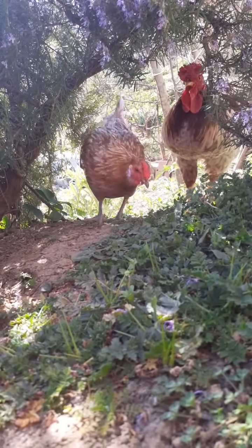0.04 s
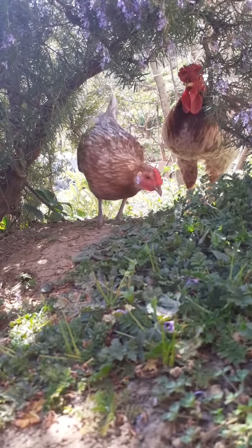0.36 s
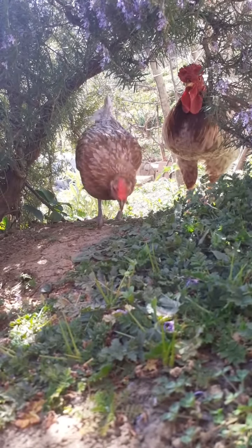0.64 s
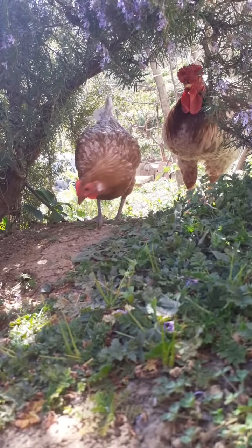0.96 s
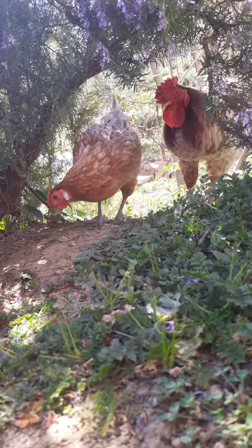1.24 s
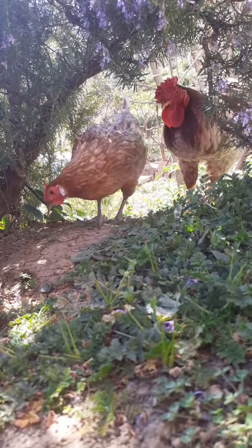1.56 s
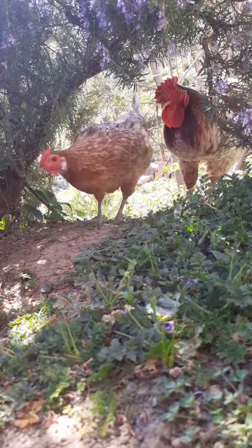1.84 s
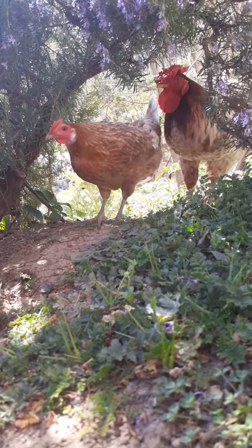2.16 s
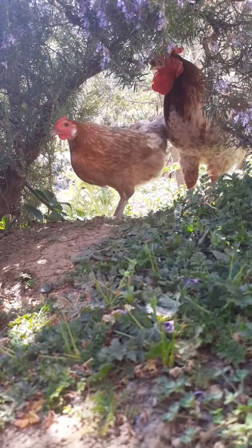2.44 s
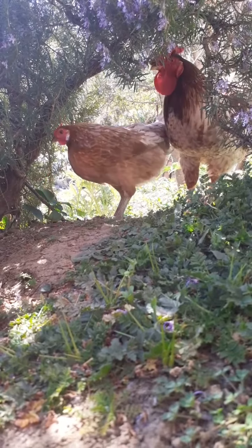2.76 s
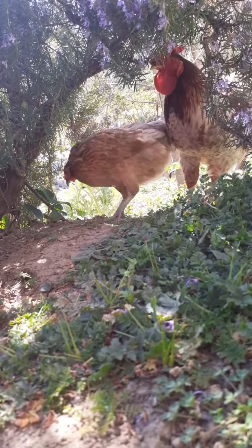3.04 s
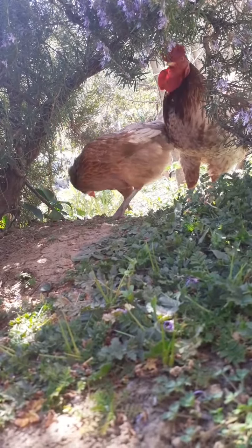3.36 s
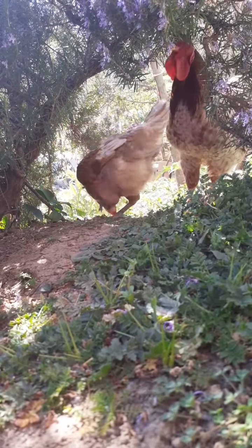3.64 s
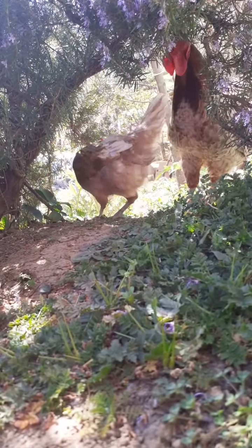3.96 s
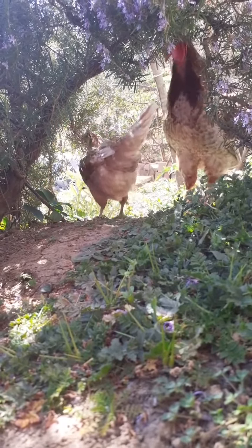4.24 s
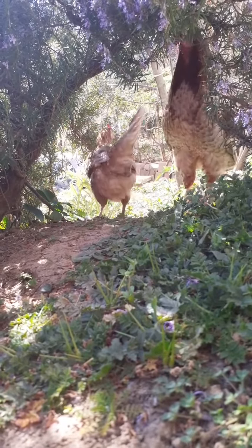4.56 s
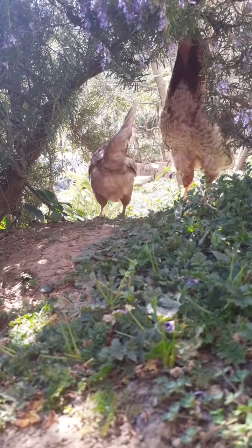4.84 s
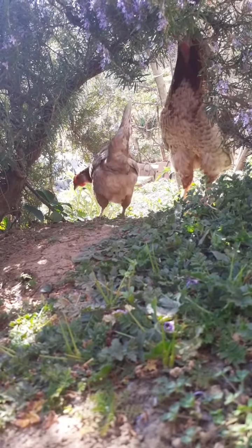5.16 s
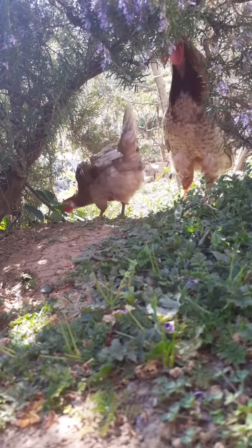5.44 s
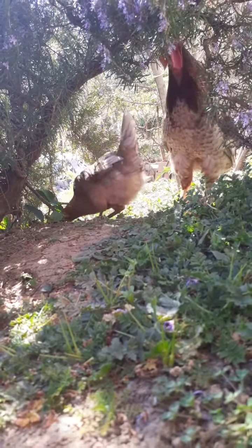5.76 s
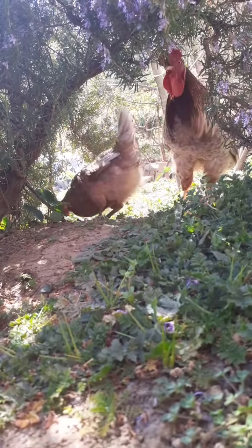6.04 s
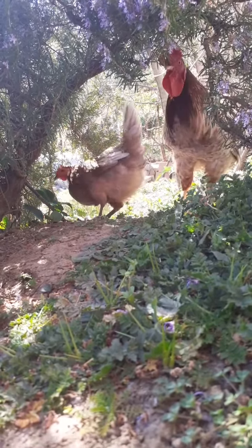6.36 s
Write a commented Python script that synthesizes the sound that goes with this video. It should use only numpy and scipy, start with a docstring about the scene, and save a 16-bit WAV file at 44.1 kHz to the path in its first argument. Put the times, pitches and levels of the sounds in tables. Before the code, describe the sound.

Soft outdoor air and a distant engine hum sit under faint bird chirps, tiny twig snaps and a hen's light steps in dry leaves. The hen clucks once, quietly. Then a rooster crows loudly from under a shrub a few steps from the microphone: a short harsh note, a long one whose clear pitch keeps breaking into a rasp, and a soft, low closing groan.

```python
"""Soft outdoor air and the hum of a far engine come first, with small birds, ticking twigs, a hen's
steps in dry leaves and one cluck. Then a rooster crows under a shrub a few steps away: a harsh short
note, a long one whose clear pitch keeps breaking into a rasp, and a soft closing groan. Breath drives
his membranes between regular and irregular oscillation, and the resonances of throat and beak filter
the pulses. Leaves and yard scatter the crow, and it pushes the microphone's automatic gain down."""
import sys
import numpy as np
from scipy import signal
from scipy.fft import rfft, irfft
from scipy.io import wavfile
from scipy.ndimage import uniform_filter1d

SR = 44100
rng = np.random.default_rng(int(sys.argv[2]) if len(sys.argv) > 2 else 0)


def unload_audio(sound):
    """Save the sound as a 16-bit wav file, at the path given as the first command line argument."""
    columns = np.transpose(np.atleast_2d(sound))
    # keep every value between -1 and 1, then stretch to whole-number steps
    steps = np.round(np.clip(columns, -1, 1) * 32767)
    wavfile.write(sys.argv[1], SR, steps.astype(np.int16))


N = 286650
TIME = np.arange(N) / SR
BAND_LIMIT_HZ = 15850


def amp(db):
    """The decibel law: 20 dB is a tenfold amplitude."""
    return 10 ** (np.asarray(db) / 20)


def unit(x):
    """Normalisation to rms 1."""
    return x / np.sqrt(np.mean(x ** 2) + 1e-20)


def ages(length_s):
    """Uniform sampling: seconds since a sound's onset."""
    return np.arange(0, length_s, 1 / SR)


def bump(t, centre, width):
    """A Gaussian hump of height 1."""
    return np.exp(-((t - centre) / width) ** 2)


def between(ends, share):
    """Linear interpolation between two ends."""
    return ends[0] + (ends[1] - ends[0]) * share


def follow(rows, t):
    """Linear interpolation of a table's columns at the times t."""
    times, *columns = np.transpose(rows)
    return [np.interp(t, times, column) for column in columns]


def spectrum(points, hz):
    """Interpolation on a log-frequency axis."""
    frequencies, values = np.transpose(points)
    return np.interp(np.log(hz + 1), np.log(frequencies + 1), values)


def add(mix, start_s, sound):
    """Superposition: a sound joins the mix at start_s."""
    part = mix[max(round(start_s * SR), 0):][:len(sound)]
    part += sound[:len(part)]


def wander(t, hz, size=16384):
    """Low-pass noise: a random fluctuation of rms 1 and a bandwidth of about hz."""
    step_s = N / SR / size
    low_pass = bump(np.fft.rfftfreq(size, step_s), 0, hz)
    slow = irfft(rfft(rng.standard_normal(size)) * low_pass, size)
    return np.interp(t, np.arange(size) * step_s, unit(slow))


# Spectrum of the outdoor air: frequency_hz, relative_density_db
AIR_SPECTRUM = [(15, -42.5), (25, -28), (64, -10), (102, -8.5), (157, -11.5), (235, -19.5), (437, -21),
                (557, -28.5), (850, -28.5), (1600, -34.5), (5980, -42.5), (7630, -45.5), (9460, -53),
                (15800, -42.5)]
# Likeness of the air at left and right: frequency_hz, coherence_ratio
AIR_COHERENCE = [(500, 0.95), (1700, .5), (5000, .2)]

def air(level_db=-60.8, swell_db=2):
    """Partial coherence: outdoor noise is nearly alike on both sides at long wavelengths."""
    hz = np.fft.rfftfreq(N, 1 / SR)
    left, independent = rfft(rng.standard_normal((2, N)))
    coherence = np.clip(spectrum(AIR_COHERENCE, hz), 0, 1)
    right = coherence * left + np.sqrt(1 - coherence ** 2) * independent
    noise = irfft(np.array([left, right]) * amp(spectrum(AIR_SPECTRUM, hz)), N)
    drift_db = .6 * wander(TIME, hz=3) + swell_db * bump(TIME, centre=2.3, width=.7)
    return unit(noise) * amp(level_db + drift_db)


def hum(hz, db, waver_db, drift=.015):
    """Fluctuating propagation: a far low tone wavers on its way through the air."""
    cycles = np.cumsum(hz * (1 + drift * wander(TIME, hz=12))) / SR
    return unit(np.sin(2 * np.pi * cycles)) * amp(db + waver_db * wander(TIME, hz=15))


# Course of the far engine: time_s, pitch_hz, level_db
ENGINE_COURSE = [(0.04, 92.8, -59), (0.57, 93.1, -60), (0.73, 95.3, -62), (0.98, 110, -59),
                 (1.51, 112, -67), (1.6, 96.9, -66), (1.97, 104, -59), (2.79, 104, -53), (3.07, 104, -65),
                 (3.19, 111, -82), (3.29, 104, -60), (3.9, 101, -56), (4.09, 101, -70)]

def engines(drone_hz=153, rise_hz_per_s=8, drone_db=-61.5, peak_s=1.95, width_s=.45):
    """Periodic motion: a far engine hums throughout, and a higher, rising drone swells once."""
    from_peak_s = TIME - peak_s
    drone = hum(drone_hz + rise_hz_per_s * from_peak_s, drone_db, waver_db=3)
    swell = 1 / (1 + (from_peak_s / width_s) ** 2)
    return hum(*follow(ENGINE_COURSE, TIME), waver_db=1.5) + drone * swell


# Scatter from leaves and ground: frequency_hz, gain_db
LEAF_SCATTER = [(500, -26.5), (1300, -14.5), (2000, -22), (5000, -9.5), (8000, -1), (14000, 1.5)]
# Reverberation time of the yard: frequency_hz, t60_s
YARD_DECAY = [(800, 0.6), (2100, 0.42), (15000, 0.11)]

def reverberation(x, leaves_t60_s=.11, yard_db=-36):
    """Diffuse scattering: a quick decay from the shrub and a faint longer one from the yard."""
    hz, t, noise = signal.stft(rng.standard_normal((2, SR // 2)), SR, nperseg=256)
    yard_t60_s = spectrum(YARD_DECAY, hz)[:, None]
    leaves = amp(spectrum(LEAF_SCATTER, hz)[:, None] - 60 * t / leaves_t60_s) / np.sqrt(leaves_t60_s)
    yard = amp(yard_db - 60 * t / yard_t60_s) / np.sqrt(yard_t60_s)
    tail = signal.istft(noise * (leaves + yard) * (t > 0), SR, nperseg=256)[1]
    tail *= np.sqrt(2 * np.log(1000) / SR)  # normalises the energy of an exponential decay
    return signal.fftconvolve(x[None], tail, axes=1)[:, :N]


# The hen's steps: start_s, length_s, level_db
HEN_STEPS = [(1.68, .24, -78), (2.28, .1, -77), (2.55, .22, -75), (2.98, .13, -78), (3.72, .12, -77)]

def leaf_steps(band_hz=(2000, 5500), crackle_db=5):
    """Amplitude-modulated noise: dry leaves crackle under a hen's feet."""
    out = np.zeros(N)
    for start_s, length_s, db in HEN_STEPS:
        age = ages(length_s)
        grains = rng.standard_normal(N)[:len(age)] * amp(crackle_db * wander(start_s + age, hz=250))
        crackle = signal.lfilter(*signal.butter(1, band_hz, "band", fs=SR), grains)
        add(out, start_s, unit(crackle) * amp(db) * np.sin(np.pi * age / length_s))
    return out


# Chirps: start_s, length_s, start_pitch_hz, end_pitch_hz, level_db, buzz_width_hz
BIRD_CHIRPS = [(.15, 0.063, 5500, 5480, -79, 80), (1.32, .07, 4500, 4200, -77, 300),
               (2.37, 0.095, 5117, 4650, -64, 600), (2.381, 0.19, 4100, 3800, -71, 503),
               (3.059, .19, 5740, 5220, -77, 150), (3.561, 0.16, 4330, 3830, -70.5, 450),
               (3.659, 0.19, 8360, 7500, -79, 150), (6.108, 0.37, 2166, 2095, -85, 39.04)]

def small_birds():
    """Modulation sidebands: a random buzz widens each falling tone into a narrow band."""
    out = np.zeros(N)
    for start_s, length_s, start_hz, end_hz, db, buzz_hz in BIRD_CHIRPS:
        age = ages(length_s)
        cycles = np.cumsum(between((end_hz, start_hz), (1 - age / length_s) ** 2)) / SR
        chirp = 2 * wander(age, buzz_hz) * np.sin(2 * np.pi * cycles)
        add(out, start_s, chirp * amp(db) * np.sin(np.pi * age / length_s))
    return out


# Snaps of dry twigs: start_s, onset_level_db
TWIG_SNAPS = [(0.603, -48), (1.2526, -62), (1.3503, -60), (4.1076, -56)]

def twigs(decay_s=.001):
    """Impulsive excitation: each snap is a broadband burst that decays exponentially."""
    out = np.zeros(N)
    age = np.arange(SR // 20) / SR
    for start_s, db in TWIG_SNAPS:
        add(out, start_s, amp(db) * rng.standard_normal(len(age)) * np.exp(-age / decay_s))
    return out


def soft_call(t, hz, harmonics, jitter):
    """A harmonic series on a jittering pitch: a quiet voice with the beak nearly shut."""
    cycles = np.cumsum(hz * (1 + jitter * wander(t, hz=150))) / SR
    return unit(sum(amp(db) * np.sin(2 * np.pi * round(k) * cycles) for k, db in harmonics))


# Partials of the cluck: harmonic_number, relative_level_db
CLUCK_HARMONICS = [(1, 2), (2, 5), (3, -10), (4, -6.5)]

def cluck(start_s=2.924, length_s=.04, pitch_hz=585, level_db=-47, lift=.08):
    """Joint modulation: pitch and amplitude follow one short arch."""
    out = np.zeros(N)
    age = ages(length_s)
    arch = np.sin(np.pi * age / length_s)
    voice = soft_call(start_s + age, pitch_hz * (1 + lift * arch), CLUCK_HARMONICS, jitter=.011)
    add(out, start_s, voice * amp(level_db) * arch)
    return out


# Resonances of throat and beak: centre_hz, width_hz, gain_db
FORMANTS = [(270, 240, -12), (623, 185, 3.2), (804, 119, 3.5), (1110, 280, 1.8), (1415, 370, .5),
            (1967, 260, -.5), (2790, 620, -7), (4843, 550, -11), (5946, 2600, -22), (7217, 893, -15.2),
            (9250, 1600, -35), (12070, 1300, -33), (14300, 1600, -35)]
# Opening of the beak: time_s, opening_ratio
BEAK_OPENING = [(4.19, .9), (4.31, .7), (4.42, .45), (4.56, .05), (5.17, .05), (5.33, .6), (5.47, .99),
                (5.66, .25)]

def throat(x, t, cutoff_hz=460, treble_hz=3800, ring_hz=(1390, 2100), settle_s=.09, shrill_hz=5000):
    """Source-filter principle: formants slide as neck and beak move; the beak radiates little bass."""
    hz, age, source = signal.stft(x, SR, nperseg=1024, noverlap=768)
    frame_s = t[0] + age
    progress = np.minimum(age * SR / len(t), 1)
    gape, = follow(BEAK_OPENING, frame_s)
    quiver = .009 * wander(frame_s, hz=25)  # of the straining neck
    stretch = between((1.025, .95), progress) + .045 * gape + quiver
    tract_hz = hz[:, None] / stretch + 1
    power, lag = 0, 0
    for centre_hz, width_hz, db in FORMANTS:
        detune = 2 * (tract_hz - centre_hz) / width_hz
        power = power + (amp(db) / (1 + detune ** 2 / 2) ** 2) ** 2
        lag = lag + np.arctan(detune)  # each resonance rings on after a pulse
    # the beak's ring starts high and settles; it and the shrill edge grow as the beak opens
    ring_centre_hz = between(ring_hz, bump(age, 0, settle_s))
    ring_db = between((-7, 6), gape) * bump(tract_hz, ring_centre_hz, width=260)
    shrill_db = between((-5, 12), gape) * bump(tract_hz, shrill_hz, width=560)
    flicker_db = 2 * wander(frame_s, hz=70)
    treble_db = between((-4, 2.8), np.sin(np.pi * progress)) - 3.5 * gape + flicker_db
    shelf_db = treble_db / (1 + (treble_hz / tract_hz) ** 6)
    gain = np.sqrt(power) * amp(ring_db + shrill_db + shelf_db) / (1 + (cutoff_hz / tract_hz) ** 4)
    radiated = signal.istft(source * gain * np.exp(-1j * lag), SR, nperseg=1024, noverlap=768)[1]
    return unit(radiated[:len(t)])


def wheeze(start_s=5.69, length_s=.16, level_db=-48.5, hiss_db=-14):
    """Flow noise: air rasps through the rooster's throat and hisses past his beak."""
    age = ages(length_s)
    flow = rng.standard_normal(N)[:len(age)]
    rasp = throat(np.diff(flow, prepend=0), start_s + age) + amp(hiss_db) * flow
    return start_s, rasp * amp(level_db) * np.sin(np.pi * age / length_s)


# Partials of the groan: harmonic_number, relative_level_db
GROAN_HARMONICS = [(1, -4), (2, 3.5), (3, -12.5), (4, -14), (5, -12), (6, -10)]

def groan(start_s=5.685, length_s=.56, pitch_hz=283, level_db=-35, attack_s=.045, fade_s=.3):
    """Decaying oscillation: the last air leaves an octave lower, unsteadily, as the neck sinks."""
    age = ages(length_s)
    t = start_s + age
    lift = .18 * bump(t, centre=5.8, width=.055)
    voice = soft_call(t, pitch_hz * (1 + lift), GROAN_HARMONICS, jitter=.04)
    fade_db = -44 * (1 - np.exp(-age / fade_s))
    waver_db = 2.5 * wander(t, hz=30)
    envelope = np.minimum(age / attack_s, 1) * signal.windows.tukey(len(t), .05)
    return start_s, voice * amp(level_db + fade_db + waver_db) * envelope


def pulses(cycles, hz, octave_db, upper_db):
    """Fourier synthesis: harmonics in phase, up to the band limit, add to one pulse a cycle."""
    phase = 2 * np.pi * cycles
    upper = sum((k * hz < BAND_LIMIT_HZ) * np.cos(k * phase) for k in range(3, 29))
    return unit(np.cos(phase) + amp(octave_db) * np.cos(2 * phase) + amp(upper_db) * upper)


def clear_voice(t, hz, hiss=.11):
    """Periodic oscillation: the membranes beat regularly, with slight flutter and a little air."""
    flutter = .011 * wander(t, hz=70) + .012 * wander(t, hz=700)
    cycles = np.cumsum(hz * (1 + flutter)) / SR
    beat = pulses(cycles, hz, octave_db=2, upper_db=-6)
    return throat(beat + hiss * rng.standard_normal(N)[:len(t)], t)


def harsh_voice(t, hz, jitter=.082, doubling=.99, hiss=.56):
    """Period doubling: overblown membranes give uneven pulses, strong and weak in turn, with puffs."""
    cycles = np.cumsum(hz * (1 + jitter * wander(t, hz=140))) / SR
    strength = 1 + doubling * np.cos(np.pi * cycles + 2 * wander(t, hz=50))
    beat = unit(strength * pulses(cycles, hz, octave_db=0, upper_db=2.5))
    puffs = unit(np.exp(-2 * (cycles % 1)) * rng.standard_normal(N)[:len(t)])
    voice = throat(beat + hiss * puffs, t)
    swing = np.sqrt(abs(uniform_filter1d(voice ** 2, size=500)) + 1e-9)
    shudder_db = 1.3 * wander(t, hz=110)
    return unit(voice / swing * amp(shudder_db))  # air pressure holds the swing steady


# Spells of clear tone: start_s, length_s, clarity_ratio
LOCKED_SPELLS = [(4.556, .6, .93), (5.255, .1, .68), (5.625, .04, .7)]

def clarity(t, lock_s=.016, fray_power=6):
    """Mode locking, 0-1: the membranes lock quickly into a regular beat and fray as a spell ends."""
    locked = 0
    for start_s, length_s, depth in LOCKED_SPELLS:
        onset = np.clip((t - start_s) / lock_s, 0, 1)
        hold = 1 - np.clip((t - start_s) / length_s, 0, 1) ** fray_power
        locked = locked + depth * onset * hold
    return locked


def pitch_contour(t, age, length_s, top_hz, squeak_hz=1040, low_hz=558, drop_at_s=5.42, drop_s=.06):
    """Frequency glide: a squeak, a scoop up into an arch and, late in the crow, a low register."""
    droop = .4 * (age - .22 * length_s) ** 2
    scoop = .06 * bump(age, 0, width=.04)
    hz = top_hz * (1 - droop - scoop)
    hz = between((hz, low_hz), np.clip((t - drop_at_s) / drop_s, 0, 1))
    return between((hz, squeak_hz), bump(age, 0, width=.014))


# Breaks of the clear tone into a rasp: time_s
VOICE_BREAKS = [4.641, 4.676, 4.772, 4.804, 4.938, 4.974, 5.004]

def crow_note(start_s, length_s, effort_db, top_hz, attack_s, release_s, tremor_hz=30, break_s=.012):
    """Bifurcation: the voice passes back and forth between the clear and the harsh regime."""
    age = ages(length_s)
    t = start_s + age
    rough = 1 - clarity(t)
    fraying = np.sin(np.pi * rough) ** 2  # the voice shivers most halfway between the regimes
    tremor = np.cos(2 * np.pi * tremor_hz * (t - VOICE_BREAKS[0]))
    breaks = sum(np.exp(-(2 * (t - s) / break_s) ** 4) for s in VOICE_BREAKS)
    # at each shiver and each break the tone roughens and the pitch sags
    blend = np.pi / 2 * np.clip(.93 * rough + .08 * (1 + fraying) * tremor + breaks, 0, 1)
    shiver_sag = .006 * tremor + .02 * fraying * (1 + tremor)
    break_sag = .028 * sum(bump(t, s, width=.018) for s in VOICE_BREAKS)
    hz = pitch_contour(t, age, length_s, top_hz) * (1 - shiver_sag - break_sag)
    voice = np.cos(blend) * clear_voice(t, hz) + np.sin(blend) * harsh_voice(t, hz)
    spent_db = -9.5 * age / length_s  # the air runs out
    dips_db = -3.5 * bump(t, centre=5.23, width=.09) - 2 * breaks  # one falter, and the breaks
    envelope = np.minimum(age / attack_s, 1) * np.minimum((length_s - age) / release_s, 1)
    return start_s, voice * amp(effort_db + spent_db + dips_db) * envelope


# Notes of the crow: start_s, length_s, effort_db, top_pitch_hz, attack_s, release_s
CROW_NOTES = [(4.183, .25, -4, 705, .035, .075), (4.538, 1.15, -7.4, 822, .042, .04)]

def rooster():
    """Breath-driven phonation: two loud notes, then the groan with its thin wheeze."""
    out = np.zeros(N)
    for note in CROW_NOTES:
        add(out, *crow_note(*note))
    add(out, *groan())
    add(out, *wheeze())
    return out


def ports(x, lead, balance):
    """Path difference and diffraction: the left port hears first, and the housing shades each port."""
    hz = np.fft.rfftfreq(N, 1 / SR)
    left_gain = amp(spectrum(balance, hz))
    lead_s = spectrum(lead, hz) / 1000
    pair = np.array([left_gain * np.exp(2j * np.pi * hz * lead_s), np.ones(len(hz))])
    equal_power = np.sqrt(2 / (1 + left_gain ** 2))
    return irfft(rfft(x) * pair * equal_power, N)


# Arrival at the microphone's two ports, for rooster and farm: frequency_hz, left_lead_ms
ROOSTER_ARRIVAL = [(400, .09), (800, .14), (1100, .13), (1400, .2), (1850, .27), (2200, .23), (2900, .205),
                   (4200, .262), (12000, .25)]
FARM_ARRIVAL = [(100, .11), (3000, 0.096)]
# Balance between the ports, for rooster and farm: frequency_hz, left_minus_right_db
ROOSTER_BALANCE = [(300, -1), (800, -4.5), (1400, -6.5), (1900, 0), (2800, 0), (4800, -2), (7400, 4),
                   (11500, 0), (15000, 7)]
FARM_BALANCE = [(100, 4), (400, -1.5), (3000, 2), (12000, 6)]

def scene():
    """Superposition of direct and scattered sound: the rooster to one side, over the quiet farm."""
    crow = rooster()
    small_sounds = cluck() + leaf_steps() + small_birds() + twigs()
    farm = air() + small_sounds + engines()
    direct = ports(crow, ROOSTER_ARRIVAL, ROOSTER_BALANCE) + ports(farm, FARM_ARRIVAL, FARM_BALANCE)
    return direct + reverberation(crow + small_sounds)


def record(dry, threshold_db=-11.4, recover_db_per_s=.27):
    """Automatic gain control drops at once and creeps back; soft clipping and a low-pass follow."""
    power_db = 10 * np.log10(abs(uniform_filter1d((dry ** 2).mean(0), size=2600)) + 1e-12)
    recovery_db = TIME * recover_db_per_s
    peak_db = np.maximum.accumulate(power_db + recovery_db) - recovery_db
    held = dry / amp(np.maximum(peak_db - threshold_db, 0))
    rounded = held / (1 + held ** 12) ** (1 / 12)
    low_pass = signal.firwin(511, BAND_LIMIT_HZ, window=("kaiser", 9), fs=SR)
    return signal.oaconvolve(rounded, low_pass[None], "same")


dry = scene()
out = record(dry)
unload_audio(out)
```